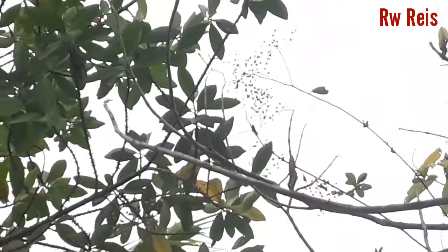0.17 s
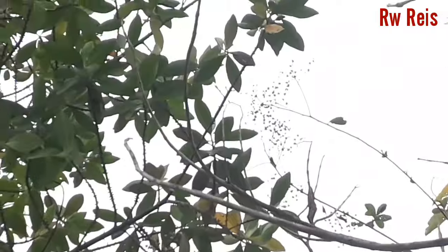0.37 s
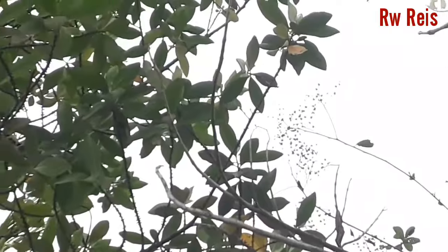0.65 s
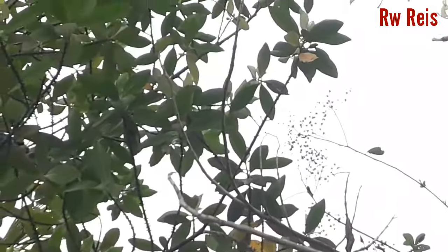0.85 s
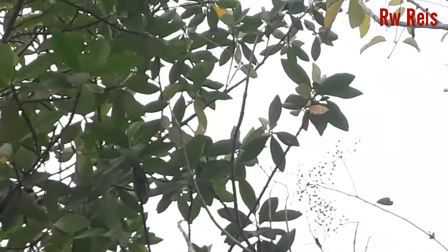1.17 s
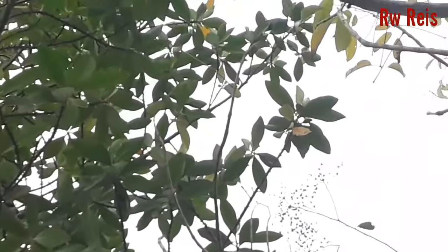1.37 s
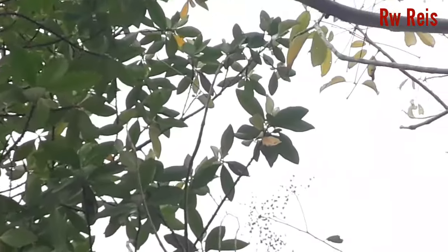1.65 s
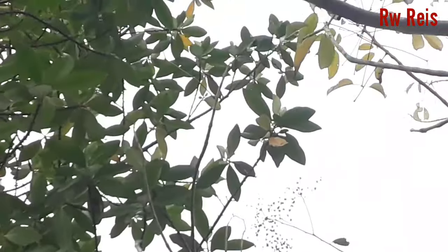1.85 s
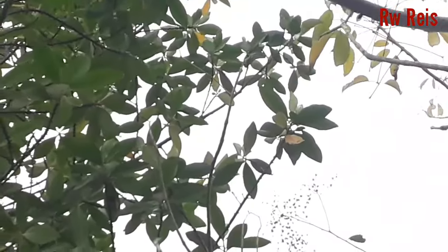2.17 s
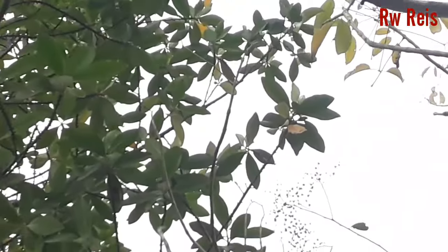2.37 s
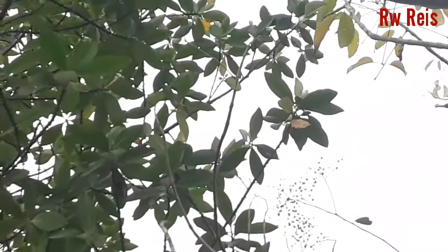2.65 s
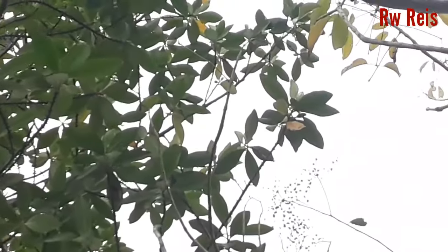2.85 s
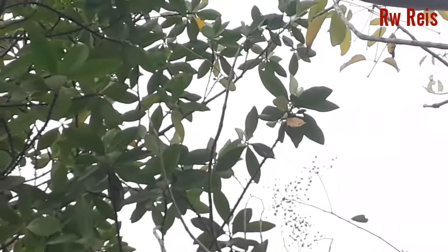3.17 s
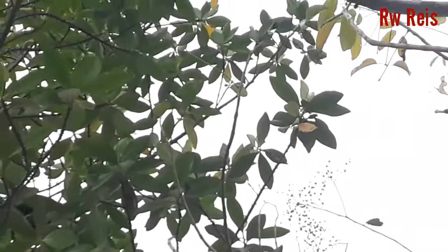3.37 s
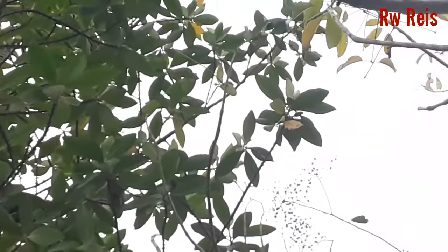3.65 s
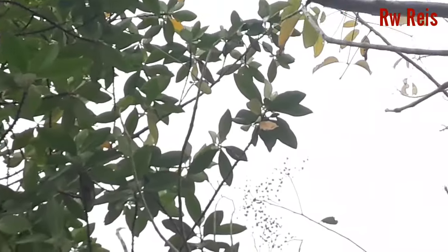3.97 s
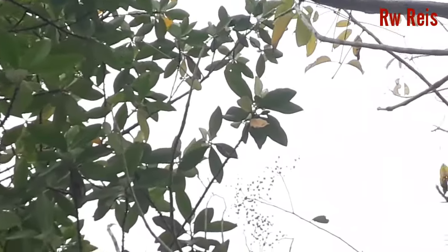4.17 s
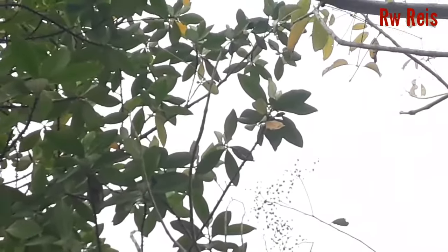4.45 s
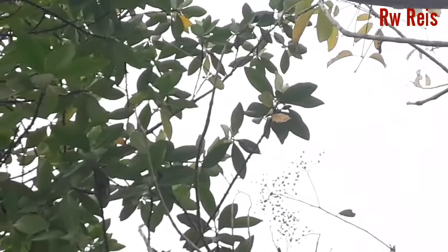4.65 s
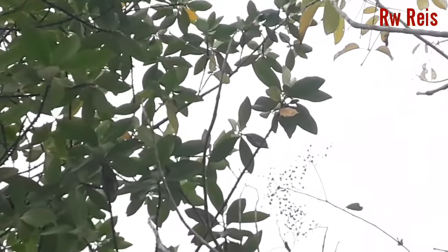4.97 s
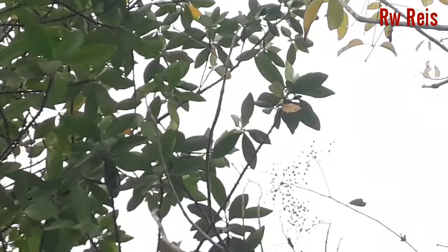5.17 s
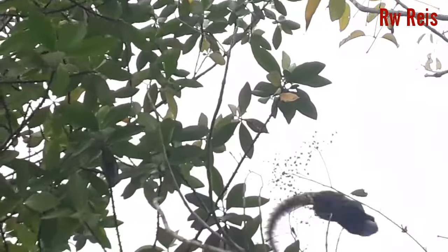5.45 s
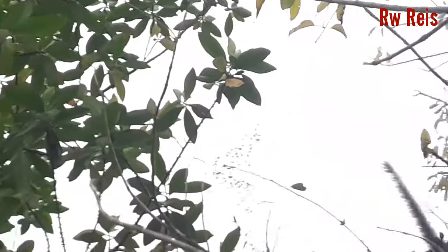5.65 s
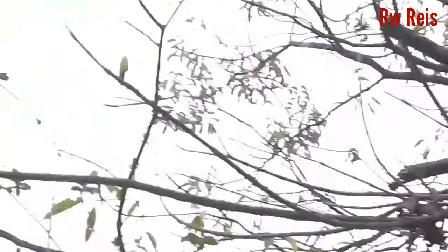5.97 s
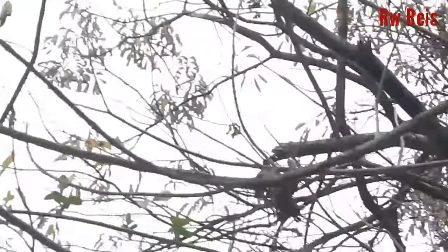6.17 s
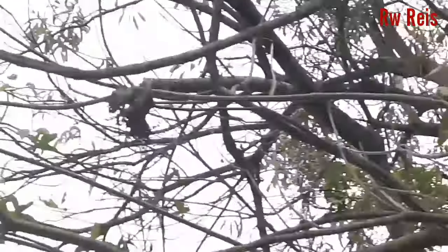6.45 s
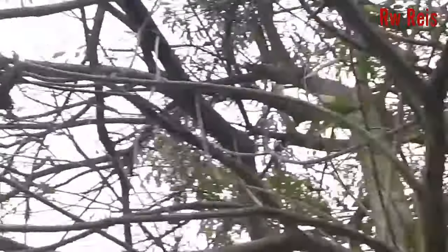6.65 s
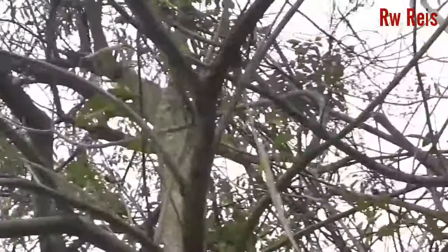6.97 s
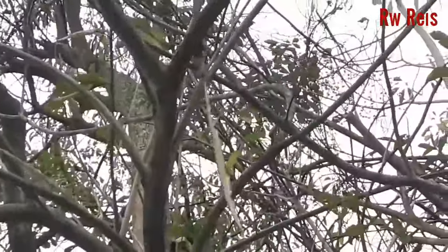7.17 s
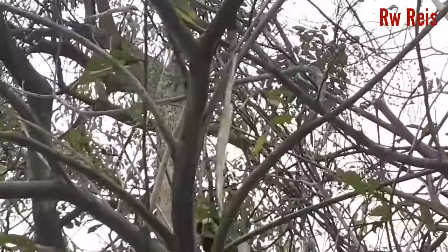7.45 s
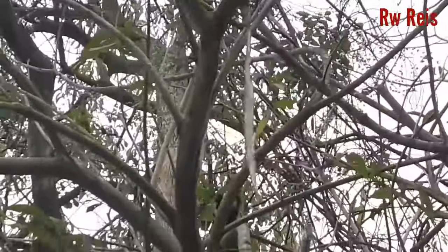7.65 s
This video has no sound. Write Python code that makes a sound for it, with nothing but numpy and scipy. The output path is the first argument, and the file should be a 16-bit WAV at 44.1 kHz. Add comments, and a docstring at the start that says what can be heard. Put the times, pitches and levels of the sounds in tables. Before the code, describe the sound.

Isolated, needle-sharp monkey alarm chirps cut through droning insects, faint bird chatter and a thin intermittent cricket. Small low grunts answer most of them. In the second half a songbird repeats fast three-note whistles almost without pause, with other birds twittering, while foliage rustles and twigs snap in a cluster near six seconds. Open woodland, short diffuse echoes, a slightly harsh small microphone and almost centered sound.

```python
"""Air, droning insects, rustling leaves and sparse far chatter from the start: shaped noise and short sweeps.
A twig ticks (resonant noise bursts); a small monkey whistles gliding alarms that plunge, most then a nasal grunt.
A thin cricket hisses in spells until 3.8 s; a songbird then repeats a fast three-note phrase among other birds.
Scattered echoes surround the calls and ticks; crude sample-rate conversion gives high whistles ghost tones."""
import sys
import numpy as np
from scipy import signal
from scipy.fft import rfft, irfft
from scipy.io import wavfile
from scipy.ndimage import uniform_filter1d

SR = 44100
rng = np.random.default_rng(int(sys.argv[2]) if len(sys.argv) > 2 else 0)


def unload_wav(signal):
    """Save mono or channel-first audio to the path in sys.argv[1] as 16-bit WAV at rate SR, clipped to [-1, 1]."""
    wavfile.write(
        sys.argv[1],
        SR,
        np.round(np.clip(np.atleast_2d(signal).T, -1, 1) * 32767).astype(np.int16),
    )


N = 343980

# Air noise spectrum: freq_hz, density_db_per_hz (relative)
AIR_SPECTRUM = [(20, -5), (60, -8), (120, 0.5), (170, -4), (300, -4), (800, -10), (2000, -12.5),
                (3700, -28), (6000, -21), (10000, -24), (16000, -31)]
AIR_DB = -61.5
# Noise opposite in the two ports, spectrum: freq_hz, density_db_per_hz (relative)
SIDE_SPECTRUM = [(15, -45), (25, -7), (137, 2.5), (463, 3), (6050, -16.5), (7310, -27.5), (12900, -15),
                 (16000, -16)]
SIDE_DB = -74.5

# Insect chorus levels: time_s, low_chorus_db, high_chorus_db
INSECT_LEVELS = [(0, -60.5, -70), (.46, -56.5, -65.5), (1.06, -58, -67.5), (1.52, -70, -68),
                 (1.65, -58, -67.5), (1.86, -52.5, -66), (2.08, -64, -73), (2.45, -58, -66.5),
                 (2.74, -71, -70), (3.1, -54.5, -66), (3.43, -59.5, -65), (3.71, -56, -67),
                 (3.93, -61.5, -69), (4.229, -54.5, -65.5), (5.3, -53.5, -62), (5.9, -55.5, -59),
                 (6.9, -58, -64.5), (7.8, -70, -71.5)]
# Chorus body resonances, low then high: centre_hz, width_hz, pulses_per_s, pulse_depth_db
CHORUS_BODIES = [(4585, 530, 110, 4), (7000, 580, 270, 3)]

# Shaken leaves: time_s, level_db
RUSTLE_LEVELS = [(0, -75), (.8, -65.5), (1.19, -68), (2.6, -73.5), (3.37, -63.5), (3.78, -67.5), (4.4, -55),
                 (5.4, -57.5), (5.9, -54), (7.5, -59), (7.8, -57)]
# Leaf noise spectrum: freq_hz, density_db_per_hz (relative)
LEAF_SPECTRUM = [(200, -4), (700, -5.5), (1500, 4.5), (3000, 9), (5000, -7), (8000, -3), (11000, -14),
                 (15000, -15)]

# Far bird chatter: time_s, busyness (relative rate), level_db
CHATTER_LEVELS = [(0, 2.5, -68), (1.0, 16, -68.5), (1.65, 16, -61), (1.9, 3, -73), (3.8, 3, -76),
                  (4.1, 40, -51), (5.2, 40, -56), (5.8, 35, -56), (6.4, 22, -58), (7.8, 14, -62)]

# Notes that scoop up to a held pitch: start_s, length_s, held_hz, level_db, scoop_share (below held_hz)
SCOOPED_NOTES = [(.015, 0.037, 2260, -59.5, 0.13), (3.548, 0.32, 7120, -64, .04),
                 (3.857, 0.028, 2650, -64, 0.22), (4.369, 0.015, 4470, -43.5, .23),
                 (4.529, 0.028, 4660, -42, .15), (4.604, 0.019, 4720, -42.5, 0.055),
                 (4.775, 0.029, 4710, -45, .13), (4.851, .037, 4805, -42, 0.048),
                 (5.024, 0.038, 4800, -48.5, 0.13), (5.301, .03, 5040, -48, 0.158),
                 (5.389, .079, 5270, -59.5, .08), (5.576, 0.031, 4980, -48, .12),
                 (6.536, 0.022, 4077, -39, .04), (6.863, 0.027, 3590, -48, 0.073)]
# Double upward flicks of a distant bird: start_s, level_db
FLICK_CALLS = [(3.561, -53), (3.7, -54.5), (3.801, -52.5)]
# Two parts of a flick: delay_s, length_s, middle_hz, level_db (added), sweep_octaves
FLICK_PARTS = [(0, .017, 3800, 2, 0.78), (.01, 0.012, 2570, -8, 1)]
# Single-direction sweeps: start_s, length_s, middle_hz, level_db, sweep_octaves (+ rising)
SWEPT_NOTES = [(3.613, .024, 2600, -60, .6), (4.079, .014, 3280, -54, 0.38), (4.23, 0.011, 3850, -48, 0.83),
               (4.384, 0.025, 3830, -51.5, -.68), (4.623, .02, 4266, -44.5, 0.36),
               (5.164, 0.015, 4070, -44.5, .49), (5.404, 0.021, 4470, -47, -0.37),
               (5.682, 0.012, 4560, -43.5, -.52), (5.874, 0.03, 5100, -51, 0.64),
               (5.945, 0.017, 3985, -44.5, 0.39), (5.978, 0.0197, 4430, -41, -0.31),
               (6.199, 0.02, 5110, -48, .8), (6.264, .022, 3756, -42, .4),
               (6.286, 0.016, 4970, -44.5, -0.8), (6.52, 0.013, 4430, -46.5, 0.86)]
# Notes that droop at the end: start_s, length_s, held_hz, level_db, droop_share (below held_hz)
DROOPING_NOTES = [(5.107, 0.035, 4900, -46, .2), (6.565, 0.046, 4000, -45, 0.16),
                  (6.894, .05, 3980, -48.5, 0.13), (7.19, 0.088, 3980, -47, 0.186),
                  (7.505, 0.079, 3845, -44.5, 0.14)]
SCOOP_BEND_SHARE, DROOP_BEND_SHARE = .45, 0.62  # bend point, share of note length
NOTE_ACCENT_DB, NOTE_FADE_DB = 1.5, 2.5  # extra level at start, loss at end

# Breath noise spectrum: freq_hz, density_db_per_hz (relative)
BREATH_SPECTRUM = [(500, -23.5), (2500, 6), (4500, 3), (6000, -9.5), (8000, 1), (10000, -11), (15000, -25)]
BREATH_DB = -14.5  # relative to voice rms

# Twig and leaf ticks: start_s, peak_db (before echoes), centre_hz
TICK_EVENTS = [(0.155, -42.5, 1270), (1.76, -63, 1810), (3.53, -37.5, 1640), (3.764, -46, 1830),
               (4.302, -33.5, 2400), (4.625, -34.5, 1510), (5.271, -41, 2110), (5.731, -37.5, 1930),
               (5.833, -30, 2550), (5.917, -29.5, 1360), (5.974, -38, 1650), (6.089, -52, 2490),
               (6.264, -41, 2490), (7.492, -41.5, 2450)]

# Alarm whistles up to the break, one curve each: time_s, pitch_hz, level_db
ALARM_CURVES = [
    [(.215, 14360, -43), (.224, 15260, -39.5), (.233, 15680, -21), (.24, 15760, -25), (.247, 16850, -23.5),
     (.256, 17780, -17.5), (.263, 16910, -27), (.268, 15870, -21.5)],
    [(.691, 12830, -54), (.7, 13130, -30), (.708, 12820, -42), (.714, 13180, -32), (.72, 14530, -27),
     (.727, 14910, -25), (.733, 13870, -36)],
    [(1.909, 12570, -37), (1.924, 11880, -34.5), (1.932, 10990, -20.5), (1.941, 10640, -31.5),
     (1.95, 9890, -25.5), (1.956, 10290, -41), (1.962, 10950, -21.5), (1.975, 10260, -34.5),
     (1.99, 9930, -33)],
    [(2.63, 8960, -44), (2.64, 9490, -37), (2.652, 9670, -32.5), (2.66, 10910, -29), (2.667, 12210, -33),
     (2.673, 11570, -24)],
    [(3.217, 11020, -41), (3.232, 9270, -29), (3.24, 8790, -24), (3.247, 8720, -30), (3.252, 8710, -15),
     (3.258, 7826, -18)],
    [(5.499, 12910, -43), (5.506, 12360, -32), (5.513, 11750, -28), (5.519, 11410, -14),
     (5.523, 11900, -27), (5.527, 12600, -28), (5.533, 12500, -28), (5.538, 11750, -28)],
    [(6.949, 13970, -42), (6.966, 13670, -34), (6.974, 14740, -22), (6.982, 16010, -26.5),
     (6.99, 16400, -24), (6.995, 16110, -19.5)],
    [(7.599, 13570, -46), (7.61, 13350, -38), (7.616, 13260, -38), (7.623, 14340, -29),
     (7.63, 15120, -13.5), (7.636, 14240, -44)],
]
# Plunge ending each whistle (the third ends on a faint rise): length_s, last_hz, level_db (before colour)
PLUNGE_ENDS = [(0.01, 6300, -20), (.015, 4000, -22), (0.012, 11000, -47), (0.016, 2400, -21.5),
               (.015, 3790, -20.5), (0.0058, 6200, -26.5), (0.016, 4260, -26.5), (.017, 3900, -16)]
# Plunge loudness by pitch: pitch_hz, level_db (added)
PLUNGE_LEVELS = [(2800, -26), (3700, -19.5), (4800, -9), (5800, -11.5), (7300, 2.5), (8800, -7.5),
                 (11000, -0.5), (15000, -13)]
# Grunts: start_s, length_s, first_hz, last_hz, level_db (before overtones), upper_overtones_db (added)
GRUNT_EVENTS = [(0.87, 0.029, 1120, 1193, -43, -3.5), (2.067, 0.031, 1066, 1166, -51.5, 5),
                (2.797, .030, 1176, 1265, -43.5, -3.5), (3.347, 0.028, 1172, 1300, -39.5, -3.5),
                (3.438, 0.0285, 1138, 1247, -42, -3), (7.149, 0.031, 1083, 1168, -42.5, -3),
                (7.768, 0.03, 1172, 1240, -42, -0.5)]
# Grunt overtones: multiple, level_db (added)
GRUNT_OVERTONES = [(1, -11.5), (2, -3), (3, -1.5), (4, -6.5), (5, -16.5), (6, 1.5), (7, -5)]
ALARM_OCTAVE_DB = -10.5
PLUNGE_EASE = 1.2  # exponent; above 1 starts slowly

# Cricket spells: start_s, length_s, level_db
CRICKET_SPELLS = [(.35, .2, -80), (.85, .28, -71), (1.38, .27, -71), (2.1, .1, -76), (2.43, .2, -78),
                  (2.97, .25, -73), (3.508, 0.28, -70)]
CRICKET_HZ, CRICKET_WIDTH_HZ, CRICKET_FADE_S = 7550, 90, .03

# Song phrases: start_s, level_db
SONG_PHRASES = [(3.938, -41), (4.091, -37.5), (4.255, -39), (4.426, -39.5), (4.594, -38), (4.768, -35.5),
                (4.941, -34), (5.118, -36), (5.294, -36), (5.475, -36.5), (5.653, -37), (5.831, -38),
                (6.007, -38.5), (6.186, -36.5), (6.357, -35.5), (6.524, -35.5), (6.688, -38.5),
                (6.844, -39), (6.996, -38.5), (7.151, -38.5), (7.296, -39), (7.441, -40.5), (7.580, -38.5),
                (7.718, -39)]
# Three notes of the phrase, last two apart: time_s (from phrase start), pitch_hz, level_db (added)
APART_NOTES = [
    [(.002, 2320, -7), (.008, 2863, -10.5), (.014, 3410, 0), (.017, 3580, -8)],
    [(.016, 2072, -16), (.025, 2634, -2), (.029, 3181, -7.5), (.036, 3213, 2), (.054, 3122, -5.5),
     (.060, 2400, -16)],
    [(.060, 3406, -12), (.064, 3295, 2.5), (.077, 3047, -5.5), (.087, 2270, -8)],
]
# Same notes, last two run together: time_s (from phrase start), pitch_hz, level_db (added)
JOINED_NOTES = [
    [(.002, 2440, -10), (.008, 3003, -7), (.014, 3375, -0.5), (.019, 3400, -6)],
    [(.016, 2165, -7), (.023, 2645, -4.5), (.028, 3214, -2.5), (.036, 3220, 0), (.054, 3105, -4),
     (.063, 3050, -2)],
    [(.060, 3050, -6), (.068, 2990, -2.5), (.078, 2946, -12), (.088, 2230, -13)],
]
# Blend from apart to joined: time_s, joined_share (0-1)
SLUR_SHARES = [(3.9, 0.04), (5.25, 0.07), (5.7, 0.81), (6.25, 0.77), (6.75, 0.78), (7.0, .12), (7.8, 0.11)]
SONG_HALF_DB, SONG_OCTAVE_DB = -26, -25.5  # tones at half and twice the pitch
WARM_UP_SHARP_SHARE, WARM_UP_S = 0.0522, 0.146  # initial sharpness and its decay time
PHRASE_GAP_S, HURRY = .172, 1.3  # shorter gaps shorten phrases, by HURRY per share of gap lost
NOTE_PITCH_SPREAD_SHARE, NOTE_SPREAD_DB = .012, 2.0  # random, per note

ECHO_TOP_HZ = 12600  # air and leaves dull the later echoes above this
CUTOFF_HZ = 15800


def amp(db):
    """Converts dB to linear amplitude."""
    return 10 ** (np.asarray(db) / 20)


def rms_one(x):
    """Scales to rms 1."""
    return x / np.sqrt(np.mean(x ** 2) + 1e-20)


def in_time(rows):
    """Interpolates table columns over every sample; first column is time_s."""
    time_s, *columns = np.transpose(rows)
    return [np.interp(np.arange(N) / SR, time_s, column) for column in columns]


def drift(corner_hz):
    """Random wander, rms 1: one-pole low-passed noise on a grid of 60 knots per second."""
    knots_per_s = 60
    knots = rng.standard_normal(int(N / SR * knots_per_s) + 2)
    pole = np.exp(-2 * np.pi * corner_hz / knots_per_s)
    slow = rms_one(signal.lfilter([1], [1, -pole], knots))
    return np.interp(np.arange(N) / SR * knots_per_s, np.arange(len(slow)), slow)


def coloured(x, spectrum):
    """Shapes by a spectrum interpolated on log frequency; rms 1."""
    hz, db = np.transpose(spectrum)
    grid_hz = np.arange(len(x) // 2 + 1) * SR / len(x) + 1
    gain = amp(np.interp(np.log(grid_hz), np.log(hz), db))
    return rms_one(irfft(rfft(x) * gain, len(x)))


def resonance(x, hz, width_hz):
    """Two-pole resonance with zeros at DC and Nyquist."""
    r = np.exp(-np.pi * width_hz / SR)
    zeros = [(1 - r * r) / 2, 0, (r * r - 1) / 2]
    poles = [1, -2 * r * np.cos(2 * np.pi * hz / SR), r * r]
    return signal.lfilter(zeros, poles, x)


def add_whistle(out, rows, tones, edge_s, flutter_db):
    """Adds sines along (time_s, pitch_hz, rms_db) rows at (multiple, db) tones; smoothed pitch, fluttering level."""
    time_s, hz, db = np.transpose(rows)
    at = np.arange(int(time_s[0] * SR), min(int(time_s[-1] * SR), N))
    t = at / SR
    pitch = uniform_filter1d(np.interp(t, time_s, hz), size=120, mode="nearest")
    phase = 2 * np.pi * np.cumsum(pitch) / SR
    edges = np.clip(np.minimum(t - time_s[0], time_s[-1] - t) / edge_s, 0, 1)
    edges = edges * (pitch < .49 * SR)  # mute near Nyquist
    flutter = np.interp(at - at[0], np.arange(160) * 130, rng.standard_normal(160))  # knot every 130 samples
    wave = sum(amp(d) * np.sin(k * phase + k * k) * (k * pitch < SR / 2) for k, d in tones)
    level = np.sqrt(2) * amp(np.interp(t, time_s, db) + flutter_db * flutter)
    out[at] += level * edges * wave


def woods(x, t60_s, cloud_db, build_s, blur_db, echo_s, echo_db, tail_db):
    """Direct sound plus scatter: quick blur off nearby leaves, dying echo cloud, faint long tail, single echo."""
    t = np.arange(round(.5 * SR)) / SR
    blur, cloud, tail = rng.standard_normal((3, len(t)))
    dulling = signal.butter(2, ECHO_TOP_HZ, fs=SR, output="sos")
    cloud, tail = signal.sosfilt(dulling, [cloud, tail])
    response = amp(blur_db) * rms_one(blur * amp(-60 * t / 0.091))
    response += amp(cloud_db) * rms_one(cloud * amp(-60 * t / t60_s) * np.clip(t / build_s, 0, 1))
    response += amp(tail_db) * rms_one(tail * amp(-60 * t / 0.61) * np.clip(t / .04, 0, 1))
    response /= np.sqrt(len(t))  # levels become total energy relative to direct
    response[0] = 1  # direct
    response[round(echo_s * SR)] += amp(echo_db)
    return signal.oaconvolve(x, response)[:N]


def hoarse(voice):
    """Adds breath noise that follows the short-term rms of the voice."""
    effort = np.sqrt(np.abs(uniform_filter1d(voice ** 2, size=600)))
    return voice + amp(BREATH_DB) * effort * coloured(rng.standard_normal(N), BREATH_SPECTRUM)


def air():
    """Steady coloured noise with slight level drift."""
    return amp(AIR_DB + 0.7 * drift(4.7)) * coloured(rng.standard_normal(N), AIR_SPECTRUM)


def port_difference():
    """Drifting coloured noise, added to one port and subtracted from the other."""
    return amp(SIDE_DB + 3.1 * drift(5.1)) * coloured(rng.standard_normal(N), SIDE_SPECTRUM)


def insects():
    """Noise pulsed at a wavering stridulation rate, twice through each body resonance."""
    out = 0
    for (hz, width_hz, per_s, depth_db), db in zip(CHORUS_BODIES, in_time(INSECT_LEVELS)):
        rate = per_s * (1 + 0.0196 * drift(2.88))
        beat = np.sin(2 * np.pi * np.cumsum(rate) / SR)
        pulsed = rng.standard_normal(N) * amp(depth_db * beat)
        chorus = resonance(resonance(pulsed, hz, width_hz), hz, width_hz)
        out = out + amp(db) * rms_one(chorus)
    return out


def leaves():
    """Dense grains of uneven size, coloured; the level wanders in flurries."""
    size_db = 4.4 * np.minimum(rng.exponential(1, N), 5)
    grains = amp(size_db) * rng.standard_normal(N)
    level_db = in_time(RUSTLE_LEVELS)[0] + 2.0 * drift(14)
    return amp(level_db) * coloured(grains, LEAF_SPECTRUM)


def chatter(count):
    """Short random sweeps, most rising, placed by busyness; higher from 3.9 s."""
    out = np.zeros(N)
    busy, db = in_time(CHATTER_LEVELS)
    busy_share = np.cumsum(busy) / np.sum(busy)
    for when, length, height, direction, strength in rng.random(size=(count, 5)):
        i = min(np.searchsorted(busy_share, when), N - SR // 20)
        start_s = i / SR
        length_s = 0.01097 + 0.0167 * length
        last_hz = (.8 + 0.35 * height) * (4400 if i > 3.9 * SR else 2400)
        sign = np.where(direction < .35, 1, -1)  # -1 starts below: rising
        first_hz = last_hz * (1 + sign * (.15 + .2 * strength))  # louder sweeps are wider
        level_db = db[i] + 5.5 * (strength - .5)
        rows = [(start_s, first_hz, level_db - 7), (start_s + length_s, last_hz, level_db)]
        add_whistle(out, rows, [(1, -0.5), (2, -15)], edge_s=0.0053, flutter_db=4.0)
    return out


def other_notes():
    """Lists notes as start_s, length_s, bend_share, first_hz, bend_hz, last_hz, level_db."""
    notes = []
    flicks = [(s + delay_s, length_s, hz, db + part_db, octaves)
              for s, db in FLICK_CALLS for delay_s, length_s, hz, part_db, octaves in FLICK_PARTS]
    for s, length_s, hz, db, octaves in flicks + SWEPT_NOTES:
        notes.append((s, length_s, .5, hz * 2 ** (-octaves / 2), hz, hz * 2 ** (octaves / 2), db))
    for s, length_s, hz, db, scoop in SCOOPED_NOTES:
        notes.append((s, length_s, SCOOP_BEND_SHARE, hz * (1 - scoop), hz, hz, db))
    for s, length_s, hz, db, droop in DROOPING_NOTES:
        notes.append((s, length_s, DROOP_BEND_SHARE, 1.02 * hz, hz, hz * (1 - droop), db))
    return notes


def other_birds():
    """Fluttering whistles with a weak octave, two-segment pitch and breath noise."""
    out = np.zeros(N)
    for s, length_s, bend, first_hz, bend_hz, last_hz, db in other_notes():
        rows = [(s, first_hz, db + NOTE_ACCENT_DB),
                (s + bend * length_s, bend_hz, db),
                (s + length_s, last_hz, db - NOTE_FADE_DB)]
        add_whistle(out, rows, [(1, 0), (2, SONG_OCTAVE_DB)], edge_s=0.0029, flutter_db=4.5)
    return hoarse(out)


def ticks():
    """Decaying noise bursts through a broad woody resonance, plus some raw burst for a bright edge."""
    out = np.zeros(N)
    t = np.arange(round(0.036 * SR)) / SR
    bursts = rng.standard_normal((len(TICK_EVENTS), len(t)))
    for (s, peak_db, hz), burst in zip(TICK_EVENTS, bursts):
        burst = burst * np.exp(-t / 0.0045)
        body = resonance(burst, hz, 610) + 0.046 * burst
        at = round(s * SR)
        out[at:at + len(t)] += amp(peak_db) * body / np.abs(body).max()
    return out


def alarms():
    """Near-pure gliding whistles with a fluttering octave, each breaking into a short ending, most plunging."""
    out = np.zeros(N)
    colour_hz, colour_db = np.transpose(PLUNGE_LEVELS)
    share = np.arange(1, 11) / 10
    for whistle, (length_s, last_hz, db) in zip(ALARM_CURVES, PLUNGE_ENDS):
        break_s, break_hz, _ = whistle[-1]
        plunge_hz = break_hz * (last_hz / break_hz) ** share ** PLUNGE_EASE
        plunge_db = db + np.interp(plunge_hz, colour_hz, colour_db)
        plunge = np.transpose([break_s + length_s * share, plunge_hz, plunge_db])
        call = np.vstack([whistle, plunge])
        add_whistle(out, call, [(1, 0.0035)], edge_s=0.0006, flutter_db=2.5)
        octave = call * [1, 2, 1]
        octave[:, 2] += np.interp(call[:, 1], [7800, 9200], [-30, ALARM_OCTAVE_DB])  # weaker at low pitch
        add_whistle(out, octave, [(1, 0.0024)], edge_s=.0012, flutter_db=8.5)
    return out


def grunts():
    """Overtone stacks that swell and rise in pitch, then fade at the last pitch."""
    out = np.zeros(N)
    for s, length_s, first_hz, last_hz, db, upper_db in GRUNT_EVENTS:
        rows = [(s, first_hz, db - 7.5),
                (s + 0.654 * length_s, last_hz, db),
                (s + length_s, last_hz, db - 22)]
        tones = [(k, d + upper_db * (k > 3)) for k, d in GRUNT_OVERTONES]
        add_whistle(out, rows, tones, edge_s=0.0012, flutter_db=2.5)
    return out


def cricket():
    """Noise twice through a narrow resonance, faded in and out with each spell."""
    t = np.arange(N) / SR
    gate = 0
    for s, length_s, db in CRICKET_SPELLS:
        gate = gate + amp(db) * np.clip(np.minimum(t - s, s + length_s - t) / CRICKET_FADE_S, 0, 1)
    hiss = resonance(rng.standard_normal(N), CRICKET_HZ, CRICKET_WIDTH_HZ)
    return gate * rms_one(resonance(hiss, CRICKET_HZ, CRICKET_WIDTH_HZ))


def songbird():
    """Three-note phrases: sharp at first, shorter when hurried, slurred mid-song, slightly hoarse."""
    out = np.zeros(N)
    starts_s = np.array(SONG_PHRASES)[:, 0]
    gaps_s = np.append(np.diff(starts_s), starts_s[-1] - starts_s[-2])
    chances = rng.standard_normal((len(SONG_PHRASES), 3, 2))
    tones = [(.5, SONG_HALF_DB), (1, 0.0058), (2, SONG_OCTAVE_DB)]
    for (s, db), gap_s, chance in zip(SONG_PHRASES, gaps_s, chances):
        stretch = 1 + HURRY * min(gap_s / PHRASE_GAP_S - 1, 0)
        sharp = 1 + WARM_UP_SHARP_SHARE * np.exp((starts_s[0] - s) / WARM_UP_S)
        joined = np.clip(np.interp(s, *np.transpose(SLUR_SHARES)), 0, 1)
        for apart, together, (higher, louder) in zip(APART_NOTES, JOINED_NOTES, chance):
            pitch = sharp + NOTE_PITCH_SPREAD_SHARE * higher
            note = np.array(apart) + joined * np.subtract(together, apart)
            rows = note * [stretch, pitch, 1] + [s, 0, db + NOTE_SPREAD_DB * louder]
            add_whistle(out, rows, tones, edge_s=0.0014, flutter_db=2.2)
    return hoarse(out)


def scene():
    """Mixes three echo distances and the dry layers to mid; opposed noise makes the width."""
    background = air()
    near = woods(alarms() + grunts() + ticks(), t60_s=0.22, cloud_db=-5.5, build_s=0.0043,
                 blur_db=-2.5, echo_s=0.027, echo_db=-30, tail_db=-24)
    song = woods(songbird(), t60_s=0.21, cloud_db=-11, build_s=0.02,
                 blur_db=-7.5, echo_s=.075, echo_db=-23, tail_db=-20)
    far = woods(other_birds() + chatter(count=170), t60_s=0.41, cloud_db=-4.5, build_s=0.0059,
                blur_db=-5, echo_s=.06, echo_db=-23, tail_db=-16)
    mid = near + song + far + insects() + cricket() + leaves() + background
    side = port_difference()
    return np.array([mid + side, mid - side])


def record(dry):
    """Goes to 48 kHz, then drops samples to reach 44.1 kHz: ghost tones every 3.9 kHz; low-passed at CUTOFF_HZ."""
    fast = signal.resample_poly(dry, 160, 147, axis=1, window=("kaiser", 8))
    picked = fast[:, np.arange(N) * 160 // 147]  # no interpolation: index rounded down
    low_pass = signal.ellip(12, .5, 80, CUTOFF_HZ, fs=SR, output="sos")
    return signal.sosfilt(low_pass, picked)


dry = scene()
out = record(dry)
unload_wav(out)
```